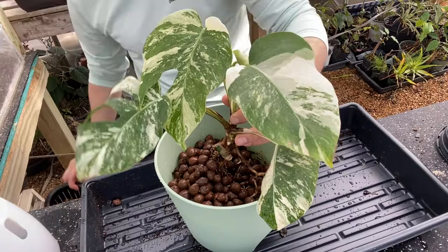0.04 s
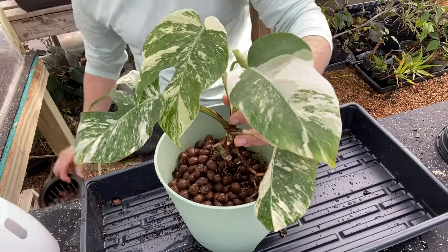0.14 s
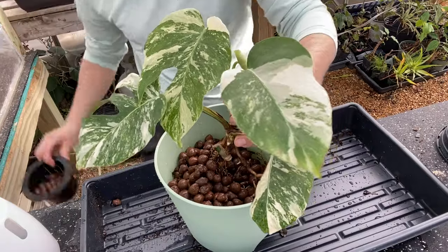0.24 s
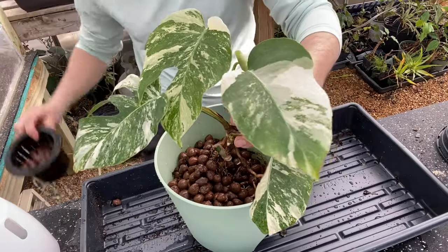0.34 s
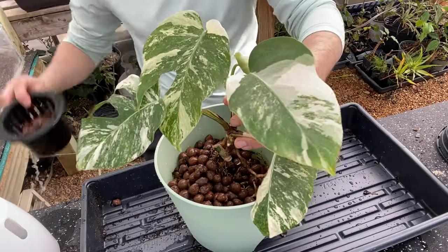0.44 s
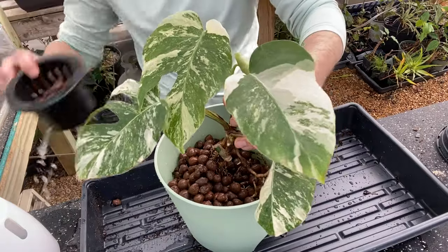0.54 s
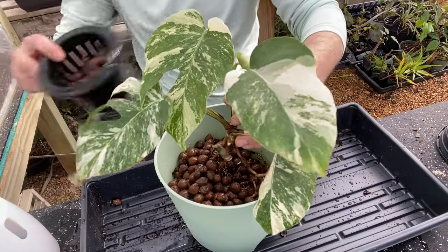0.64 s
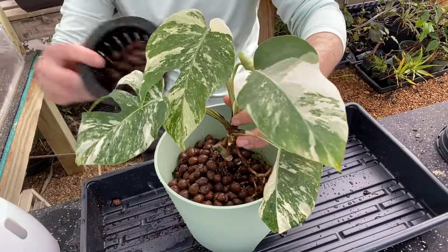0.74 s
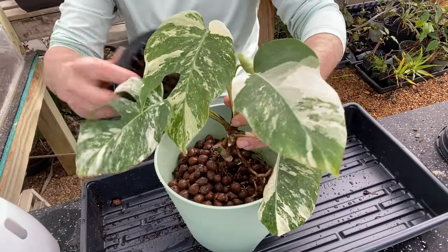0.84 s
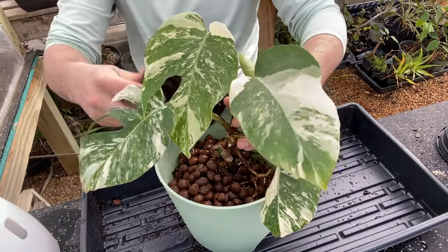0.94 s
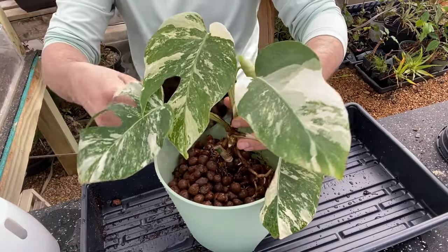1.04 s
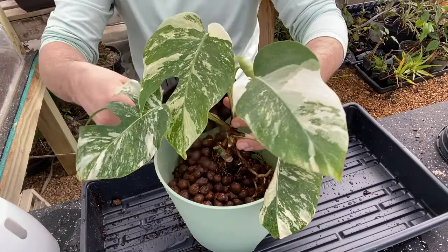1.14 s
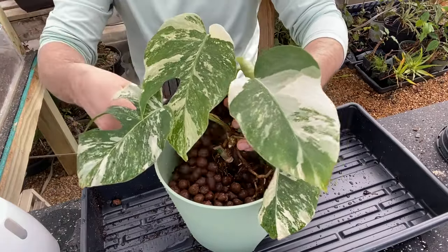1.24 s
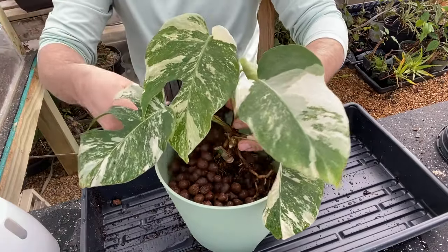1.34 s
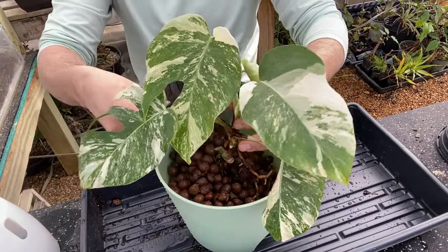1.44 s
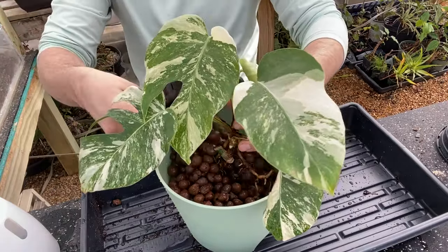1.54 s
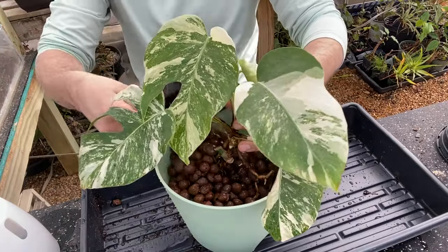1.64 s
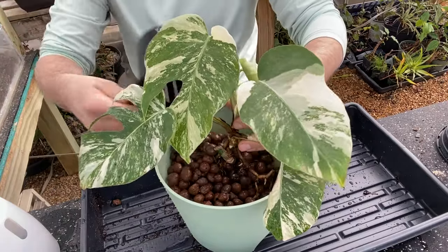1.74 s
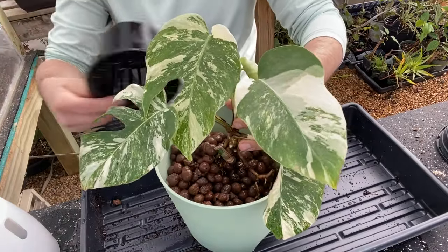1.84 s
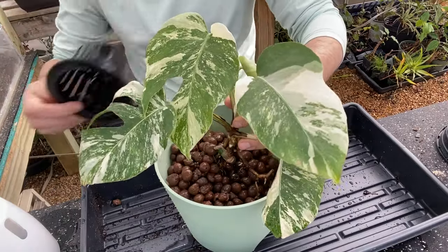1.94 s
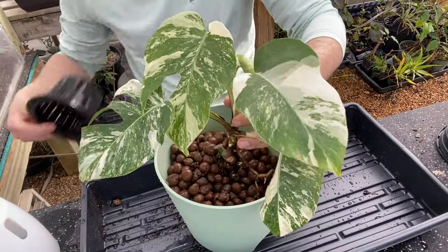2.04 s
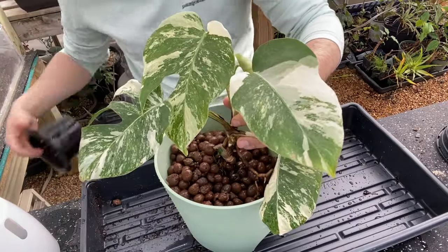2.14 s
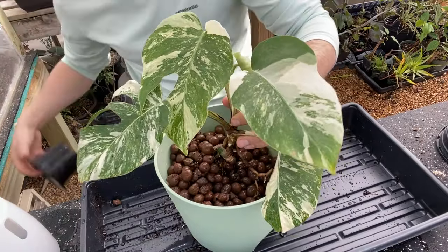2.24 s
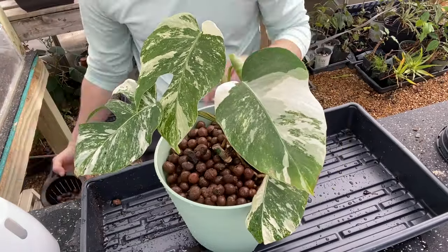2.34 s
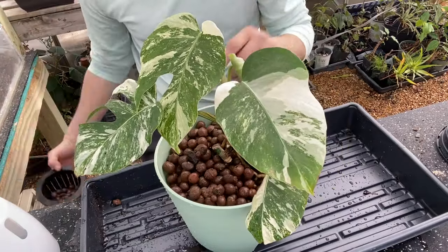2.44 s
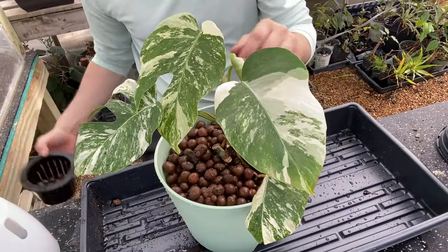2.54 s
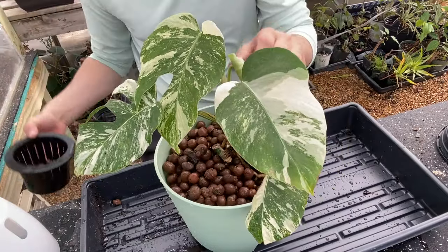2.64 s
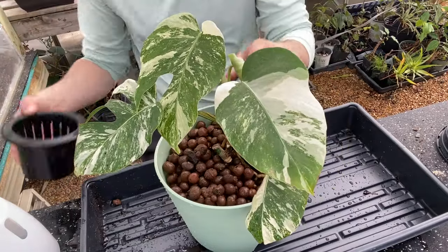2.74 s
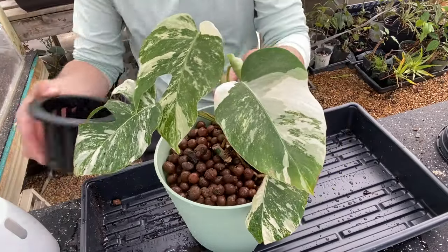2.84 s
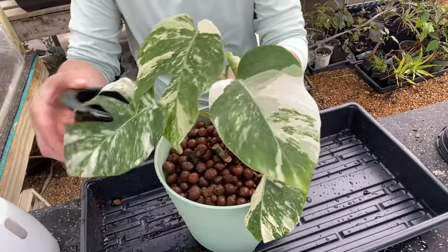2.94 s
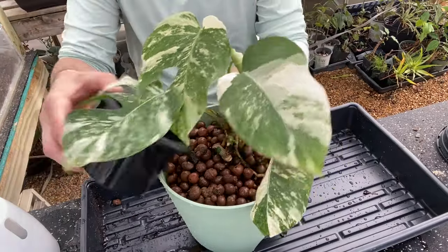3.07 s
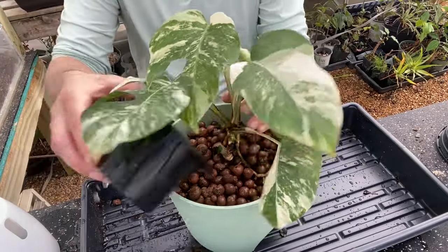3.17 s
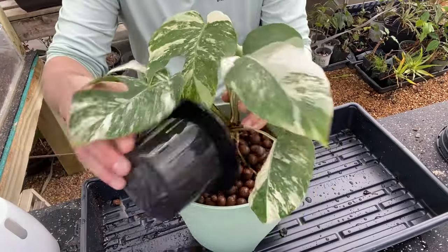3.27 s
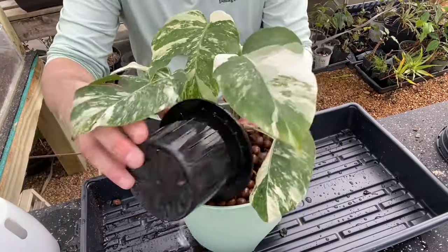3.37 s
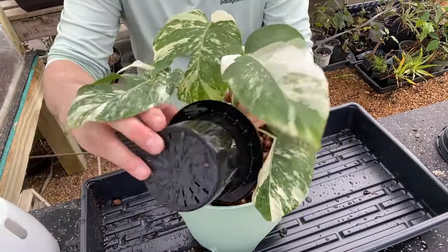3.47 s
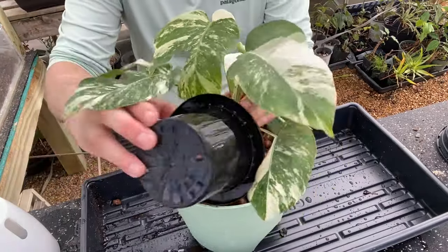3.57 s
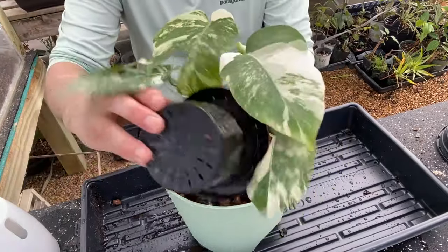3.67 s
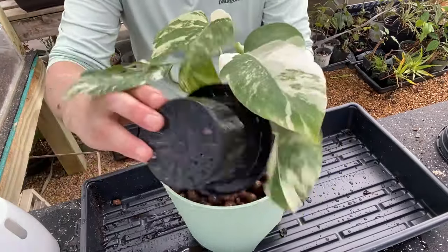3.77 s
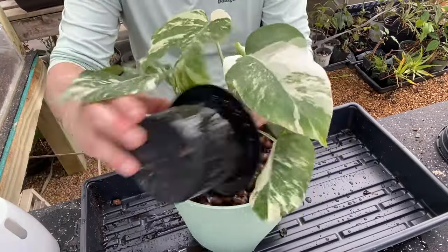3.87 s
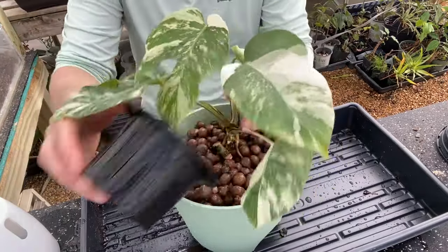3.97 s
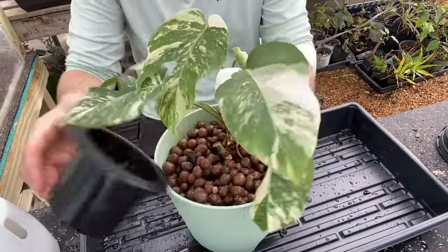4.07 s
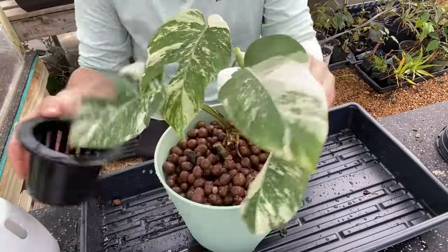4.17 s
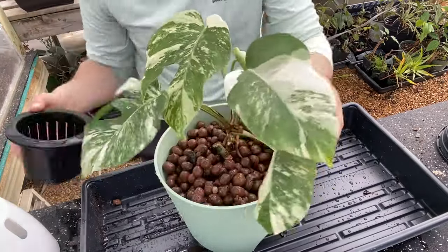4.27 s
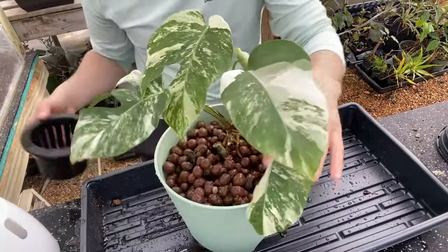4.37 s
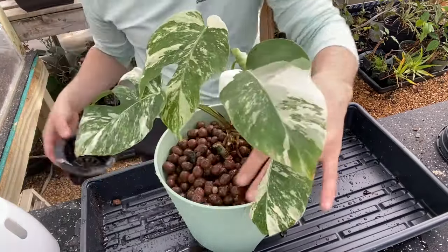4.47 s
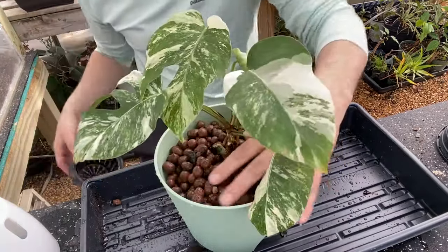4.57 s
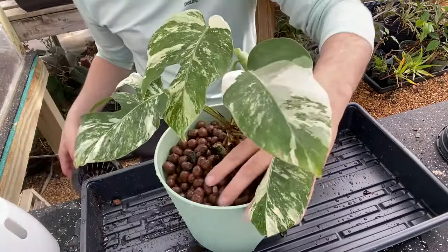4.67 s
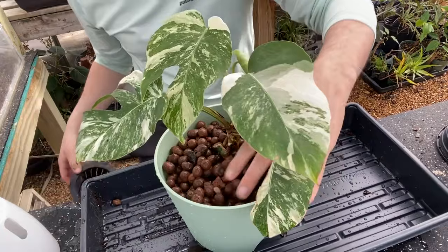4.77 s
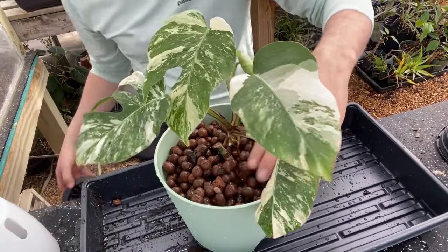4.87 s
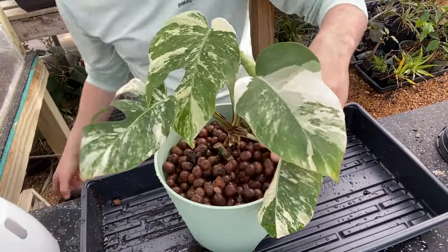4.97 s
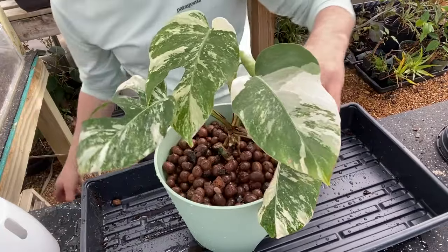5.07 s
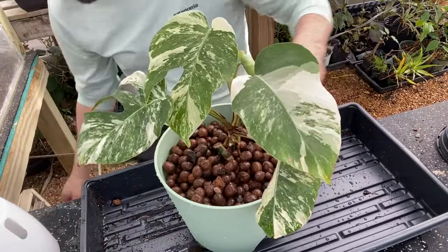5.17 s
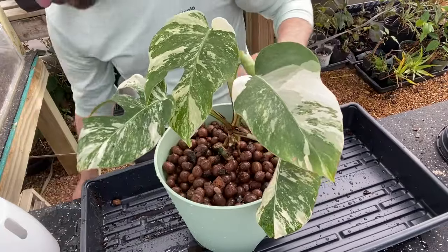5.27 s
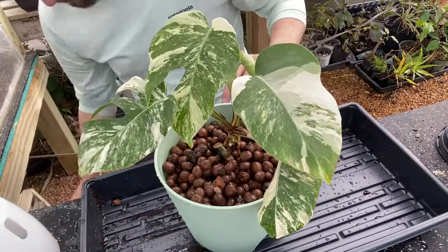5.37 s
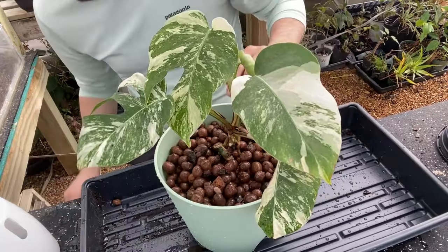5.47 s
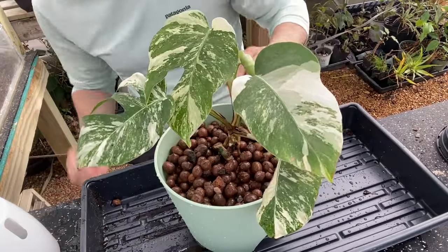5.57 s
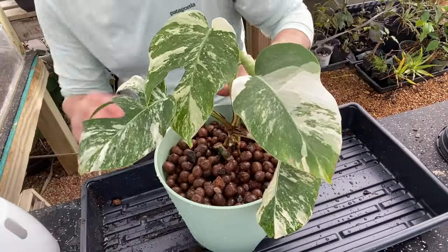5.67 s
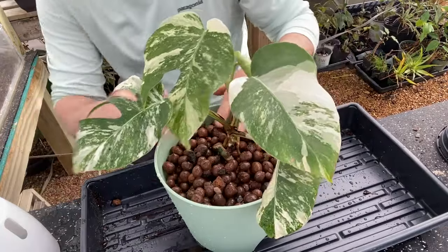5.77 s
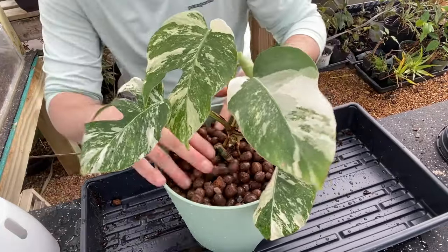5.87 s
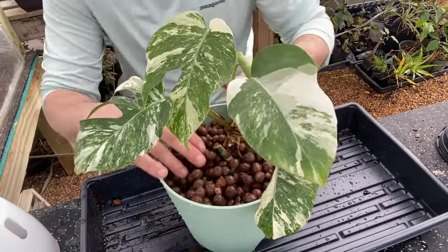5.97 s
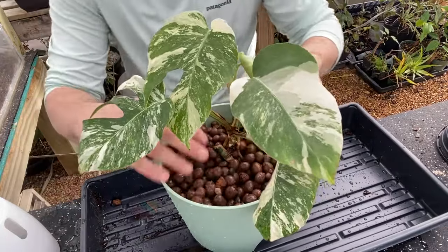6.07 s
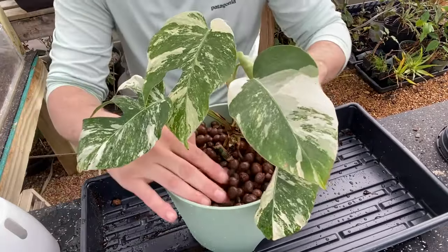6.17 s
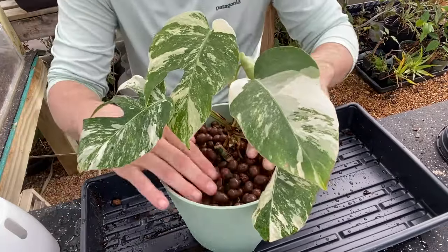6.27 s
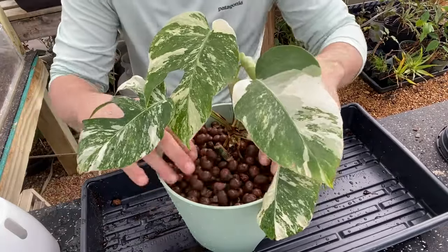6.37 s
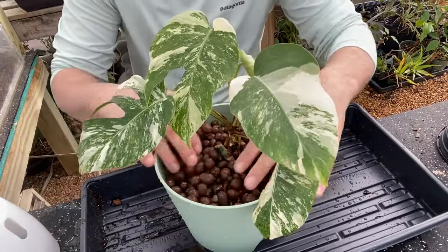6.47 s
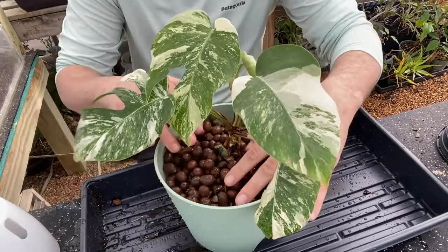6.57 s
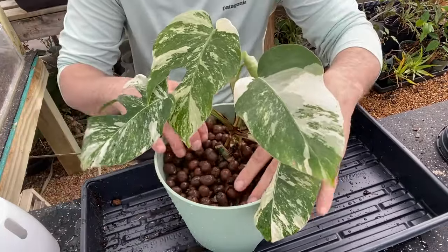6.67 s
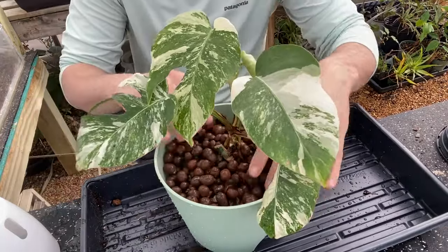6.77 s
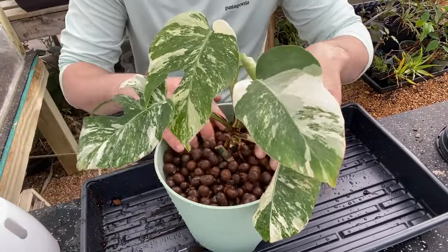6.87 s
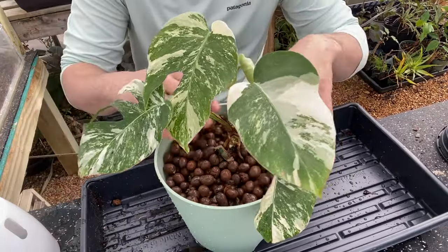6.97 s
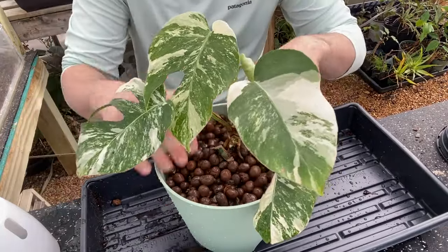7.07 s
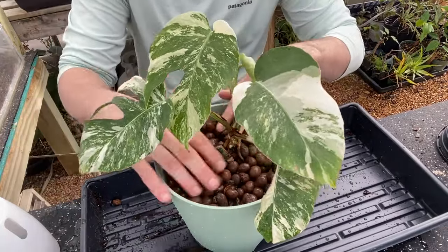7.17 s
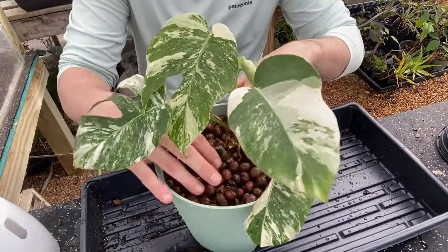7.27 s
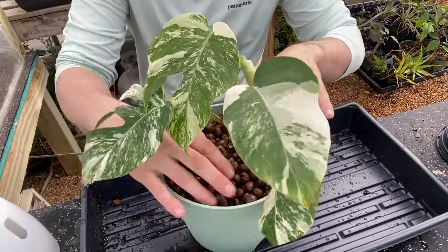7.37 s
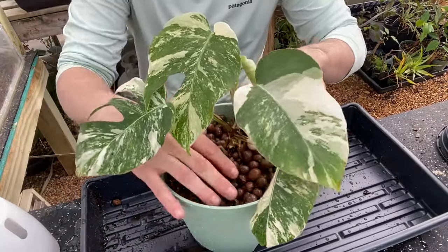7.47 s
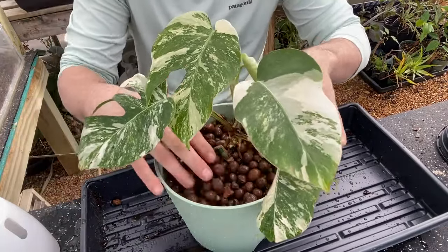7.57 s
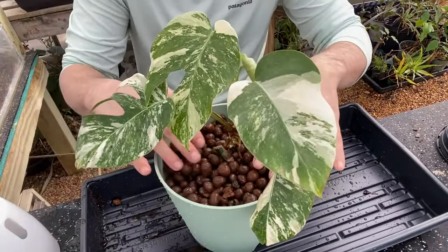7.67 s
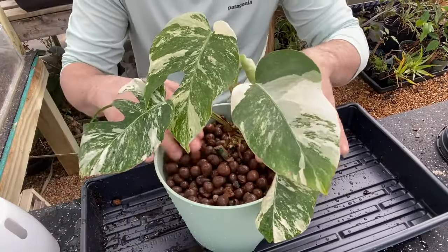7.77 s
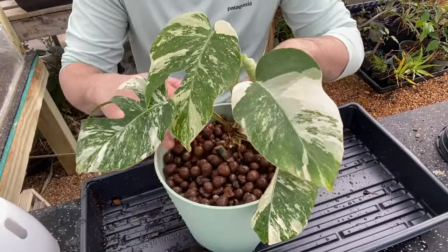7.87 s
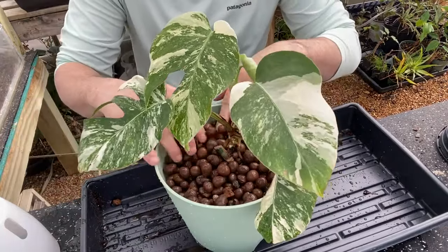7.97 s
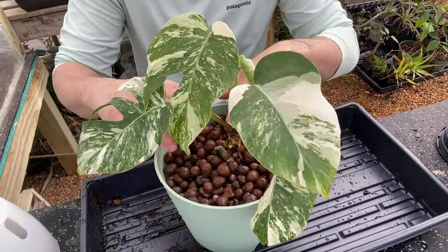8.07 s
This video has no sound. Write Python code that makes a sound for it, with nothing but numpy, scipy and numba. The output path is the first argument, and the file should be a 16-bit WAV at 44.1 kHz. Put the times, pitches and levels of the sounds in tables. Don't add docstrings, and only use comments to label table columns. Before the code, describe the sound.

Close up in a small greenhouse, a scoop of wet clay pebbles drains with plinking drips, then pours into a plastic pot in a dense, hard clatter. A few stragglers fall, there is a quieter pause, and a shorter second pour rushes in. The scoop lands with a thud, later scrapes and knocks sharply, and hands press the pebbles with repeated crunches and clicks over a faint low rumble.

```python
import sys
import numpy as np
from scipy import signal
from scipy.fft import rfft, irfft
from scipy.io import wavfile
from numba import njit

SR = 44100
rng = np.random.default_rng(int(sys.argv[2]) if len(sys.argv) > 2 else 0)


def ratio_of_db(decibels):
    return 10 ** (np.asarray(decibels, float) / 20)


def inscribe(sig):
    pcm = np.round(np.clip(np.atleast_2d(sig).T, -1, 1) * 32767)
    wavfile.write(sys.argv[1], SR, pcm.astype(np.int16))


N = 358079


def at(table, hz):
    f, v = np.transpose(table)
    return np.interp(np.log(np.maximum(hz, 1)), np.log(np.maximum(f, 1)), v)


def colour(x, gain_db):
    size = 4096
    cep = irfft(gain_db(np.fft.rfftfreq(size, 1 / SR)) * np.log(10) / 20)
    cep[1:size // 2] *= 2
    cep[size // 2 + 1:] = 0
    impulse = irfft(np.exp(rfft(cep)))
    return signal.oaconvolve(x, impulse[None], axes=1)[:, :N]


@njit
def ring(start, hz, t60, glide, left, right):
    out = np.zeros((2, N))
    for g in range(len(hz)):
        n = int(t60[g] * SR * .6)
        z, p = 1 + 0j, np.exp((2j * np.pi * hz[g] - np.log(1000) / t60[g]) / SR)
        turn = np.exp(2j * np.pi * hz[g] * glide[g] / t60[g] / SR ** 2)
        for i in range(start[g], min(start[g] + n, N)):
            out[0, i] += (left[g] * z).imag - left[g].imag * (i == start[g]) * .5
            out[1, i] += (right[g] * z).imag - right[g].imag * (i == start[g]) * .5
            z, p = z * p, p * turn
    return out


def place(s, hz, t60, size, glide, pan_db, scatter):
    # hz, left_lead_rad
    port_lead = [(0, 0), (1210, -0.9), (1980, -1.6), (5340, -3.1), (8180, 0.1), (10200, 3.1), (12200, 6.1),
                 (15300, 9.5)]
    lead = np.exp(.5j * (at(port_lead, hz) + scatter))
    side = ratio_of_db(pan_db / 2)
    start = (s * SR).astype(int)
    rows = np.broadcast_arrays(start, hz, t60, glide, size * side * lead, size / side / lead)
    return ring(*(np.ravel(r) for r in rows))


def noise(table, like):
    mid, side = rng.standard_normal((2, N))
    side = (1 - like) * side
    x = colour(np.array([mid + side, mid - side]), lambda hz: at(table, hz))
    return x / x.std()


def air():
    # hz, density_db_per_hz
    air_spectrum = [(88, -44), (150, -5), (380, -17.5), (741, -5), (1200, -1), (5270, -32.5), (8270, -23),
                    (12400, -34)]
    return noise(air_spectrum, like=0.1) * ratio_of_db(-56 - 10.5)


def greenhouse(x):
    t60_s, wet_db = 0.2, -10
    t = np.arange(int(.35 * SR)) / SR
    bright = rng.standard_normal((2, len(t))) * np.minimum(t / 0.0052, 1)
    dull = signal.lfilter([.3], [1, -.7], bright)
    tail = dull * ratio_of_db(-60 * t / t60_s) + 0.72 * bright * ratio_of_db(-60 * t / (0.56 * t60_s))
    tail *= ratio_of_db(wet_db) / np.sqrt(np.sum(tail ** 2, axis=1, keepdims=True))
    return x + signal.oaconvolve(x, tail, axes=1)[:, :N]


def surges(t, rows):
    s, db, rise, fall, tick_db = np.transpose(rows)[:, :, None]
    swell = np.maximum((s - t) / rise, 0) ** 2.9

    def shape(lingers):
        return db - 20 * (swell + np.maximum((t - s) / (fall * lingers), 0))

    return np.array([ratio_of_db(2 * v).sum(axis=0) for v in (shape(0.64), shape(0.6), shape(0.53) + tick_db)])


def pour(t, rows):
    s, db, tick_db = np.transpose(rows)
    outside_s = np.maximum(np.maximum(s[0] - t, t - s[-1]), 0)
    flow_db = np.interp(t, s, db) - 400 * outside_s
    return ratio_of_db(2 * np.array([flow_db, flow_db, flow_db + np.interp(t, s, tick_db)]))


def activity():
    # start_s, clack_db, tick_over_clack_db
    first_pour = [
        (0.838, -55.5, -9),
        (1.009, -44.5, -1.5),
        (1.105, -38, 4),
        (1.213, -34, 5),
        (1.529, -32, 3.5),
        (1.76, -37, 0),
        (1.891, -44, -11),
        (1.974, -47, 1.5),
        (2.037, -68, -20),
    ]
    second_pour = [
        (3.33, -59, -16),
        (3.402, -43, -2),
        (3.58, -30, 3.5),
        (3.744, -35.5, 2),
        (3.844, -34, -0.5),
        (3.924, -48, 0.5),
        (3.962, -41.5, -7.5),
        (4.042, -53.5, -4),
        (4.13, -49.5, -13),
    ]
    # peak_s, clack_db, rise_s, fall_s (both over 20 dB), tick_over_clack_db
    scoop_surges = [(0.01, -46, 0.11, 0.98, -1), (0.45, -51.5, 0.98, 0.69, -4),
                    (0.63, -58, 0.26, 0.45, 6.5), (0.82, -55, 0.99, 0.34, -61),
                    (2.078, -55, 0.15, 1.7, -10), (2.51, -66.5, 0.059, 0.072, 1.5),
                    (2.95, -59.5, 0.089, .15, -17), (2.71, -58, 0.032, 0.18, -18.5),
                    (4.45, -59, 0.11, 0.42, -18.5), (5.394, -36, 0.015, 0.21, -18.5),
                    (5.33, -60, .1, 0.38, -25), (5.53, -54, 0.062, 2.1, -17.5), (5.8, -78, 0.65, 0.43, -40)]
    tumble_surges = [
        (2.156, -45, 0.043, 0.13, -10),
        (2.347, -45, 0.0046, 0.18, -4),
        (2.992, -54, 0.047, 0.71, -1),
        (3.11, -45.5, 0.031, 0.37, -6.5),
        (3.276, -47.5, 0.04, 0.28, -6.5),
        (3.346, -35.5, 0.022, 0.1, -5.5),
        (4.141, -39.5, 0.018, 0.18, -9.5),
        (4.582, -60.5, 0.14, 0.13, -6.5),
        (5.12, -46, 0.013, 0.064, -5),
        (5.442, -35, 0.018, 0.11, -8.5),
    ]
    press_surges = [(4.685, -43, 0.036, 1, -6), (4.92, -38, 0.24, 0.14, -3.5),
                    (4.998, -37.5, 0.16, 0.14, -3), (5.886, -41, 0.015, 0.5, -11.5),
                    (6.051, -30.5, 0.15, 0.24, -4), (6.241, -35.5, 0.029, 0.36, -3),
                    (6.367, -37, 0.22, 0.22, -11), (6.497, -36.5, 0.016, 0.23, 3.5),
                    (6.58, -35.5, 0.096, 0.1, -0.5), (6.69, -35, 0.092, 0.73, -5),
                    (6.914, -31.5, 0.025, 0.43, -1), (7.264, -34, 0.035, 0.47, -5),
                    (7.466, -37.5, 0.015, 0.51, -5.5), (7.646, -35.5, 0.097, 0.22, -4.5),
                    (7.789, -39, 0.0081, 1, -2), (8.036, -31.5, 0.033, 0.18, -4)]
    thud_over_db = {"pour": -2.5, "scoop": -3, "tumble": -2.5, "press": -3.5}
    shake_over_db = {"pour": -18, "scoop": -14, "tumble": -14.5, "press": -15.5}
    bench_rest_db, bench_settles_s, step_s = -60.5, 0.047, .002
    t = np.arange(0, N / SR + step_s, step_s)
    parts = {"pour": pour(t, first_pour) + pour(t, second_pour), "scoop": surges(t, scoop_surges),
             "tumble": surges(t, tumble_surges), "press": surges(t, press_surges)}
    bands = sum(p * ratio_of_db(2 * np.array([[thud_over_db[k]], [0], [0]])) for k, p in parts.items())
    keep = np.exp(-step_s / bench_settles_s)
    drive = sum(p[1] * ratio_of_db(2 * shake_over_db[k]) for k, p in parts.items())
    shake = signal.lfilter([1 - keep], [1, -keep], drive)
    return t, 10 * np.log10(bands + 1e-12), 10 * np.log10(shake + ratio_of_db(2 * bench_rest_db))


def rumble():
    # hz, density_db_per_hz
    rumble_spectrum = [(20, -12), (35, -26.5), (54, 10.5), (156, -6), (258, -17.5), (400, -11), (520, -47),
                       (880, -120)]
    t, _, shake_db = activity()
    level_db = np.interp(np.arange(N) / SR, t, shake_db) + np.array([[-1.3], [1.3]])
    return noise(rumble_spectrum, like=0.57) * ratio_of_db(level_db)


def sway():
    # centre_s, level_db, length_s
    pushes = [
        (1.202, -52.5, 0.46),
        (3.158, -51.5, 0.16),
        (5.984, -47, 0.085),
        (6.28, -49.5, 0.09),
        (6.62, -46, 0.16),
        (7.013, -45, 0.17),
        (7.317, -39, 0.1),
        (7.534, -46, 0.14),
        (7.895, -45.5, 0.085),
        (8.066, -36, 0.064),
    ]
    sway_hz, width_hz = 51, 20
    t = np.arange(N) / SR
    push = sum(ratio_of_db(db) * np.exp(-((t - s) / length * 2) ** 2) for s, db, length in pushes)
    edges_hz = [sway_hz - width_hz / 2, sway_hz + width_hz / 2]
    band = signal.butter(2, edges_hz, "band", fs=SR, output="sos")
    rock = signal.sosfilt(band, rng.standard_normal(N))
    return push * rock / rock.std() * ratio_of_db(np.array([[-1.3], [1.3]]))


def thumps():
    # start_s, peak_db, pitch_hz, t60_s
    blows = [(1.3, -45.5, 229, .12), (1.4, -45, 300, .1), (2.343, -42, 567, .05), (5.3, -56.5, 331, .1),
             (3.341, -43.5, 324, 0.064), (4.137, -39.5, 80.5, 0.21), (4.135, -34.5, 122, 0.048),
             (4.19, -45, 99.3, 0.146), (5.386, -49, 630, 0.059), (5.441, -31.5, 422, 0.095),
             (5.467, -38, 307, 0.0405), (6.903, -43, 85.4, 0.14)]
    s, peak_db, hz, t60 = np.transpose(blows)
    t60 = np.clip(t60, .02, .4)
    bench = place(s, hz, t60, ratio_of_db(peak_db), -0.033, -1.0, 0.)
    tray = place(s, 1.86 * hz, t60 / 2, ratio_of_db(peak_db + 2.0), -0.12, 0., 0.)
    return bench + tray


def drips():
    # start_s, peak_db, pitch_hz, t60_s
    bubbles = [(0.058, -30, 2130, 0.041), (0.088, -35, 762, 0.057), (0.227, -35, 735.2, 0.095),
               (0.462, -36.5, 878, 0.09), (0.511, -33, 1520, 0.037), (0.088, -33, 1610, 0.038),
               (0.549, -30, 478, 0.092), (0.585, -39, 720, 0.064), (0.145, -37, 865, .05),
               (0.62, -34, 1203, 0.078), (0.704, -38.5, 846, 0.087)]
    # start_s, end_s, first_db, last_db
    run_off = [
        (0, 0.824, -48.5, -56.5),
        (2.529, 2.975, -64, -62),
        (5.446, 5.561, -57, -61.5),
    ]
    chance = rng.random((1800, 4)).T
    when = chance[0] * 5.9
    pitch = 620 * ratio_of_db(7.6 * chance[1] ** 3 + 2 * chance[3])
    flow = 0
    for start, end, first_db, last_db in run_off:
        flow = flow + (when > start) * (when < end) * ratio_of_db(np.interp(when, [start, end], [first_db, last_db]))
    size = flow * ratio_of_db(-1.73 * np.log(chance[2]))
    trickle = place(when, pitch, 32 / pitch, size, .08, 0., 2 * chance[3] - 1)
    s, peak_db, hz, t60 = np.transpose(bubbles)
    t60 = np.clip(t60, .02, .3)
    swell = place(s, hz, t60 / 4, -ratio_of_db(peak_db), 0.37 / 4, 0., 0.)
    return place(s, hz, t60, ratio_of_db(peak_db), 0.413, 0., 0.) + swell + trickle


def rub():
    # (hz, level_db)
    drags = [
        (4.55, 4.614, 0.25, [(1040, -57.5), (1850, -58), (2480, -47.5), (3900, -59)]),
        (5.385, 5.433, 0.41, [(540, -35.5), (760, -52), (1900, -52)]),
        (5.585, 5.79, 0.56, [(500, -51.5), (1330, -67), (1800, -76)]),
        (5.7, 5.75, .04, [(1370, -58)]),
        (4.783, 4.835, 0.034, [(500, -46.5)]),
        (4.875, 4.95, .04, [(500, -47)]),
        (5.96, 6.07, .04, [(500, -52)]),
        (2.72, 2.815, 0.06, [(610, -84), (1170, -69), (1830, -60.5), (2350, -75.5)]),
        (2.495, 2.54, 0.027, [(1340, -56.5)]),
        (0.045, 0.61, 0.43, [(690, -54.5), (1700, -66)]),
    ]
    slips_per_s, t60_s = 900, .025
    out = 0
    for start, end, spread, modes in drags:
        hz, db = np.transpose(modes)
        chance = rng.random((480, len(hz) + 1))
        grip_db = 1.6 * np.repeat(rng.standard_normal(30), 16)
        s = start + (np.arange(480)[:, None] + chance[:, :1]) / slips_per_s
        size = ratio_of_db(db + grip_db[:, None]) * (s < end)
        out = out + place(s, hz * (1 + spread * chance[:, 1:]), t60_s, size, 0., -1.5, 0.)
    return out


def wall():
    wall_hz, t60_s, ring_db = 514, .16, -16.5
    chance = rng.random((900, 3)).T
    s = chance[0] * N / SR
    t, levels_db, _ = activity()
    fill_db = np.interp(s, [2, 3.4], [-8, 0])
    db = np.interp(s, t, levels_db[0]) + ring_db + fill_db + 8 * chance[1]
    return place(s, wall_hz * (1 + 0.006 * (chance[2] - .5)), t60_s, ratio_of_db(db), 0., -1.1, 0.)


def body_db(hz):
    # hz, density_db_per_hz
    broad = [(160, -12.5), (358, -24.5), (510, -10), (1010, -8), (2610, -1.5), (5400, -12), (7950, -13),
             (9500, -15)]
    # pitch_hz, width_hz, level_db
    wall_modes = [(502, 8.3, -4), (786, 300, -3.5), (1170, 125, 5), (2130, 580, -1.5), (2760, 290, -14.5),
                  (4120, 1100, -21.5)]
    peaks = sum(ratio_of_db(db) / (1 + ((hz - f) / w * 2) ** 2) for f, w, db in wall_modes)
    return at(broad, np.minimum(hz, 9500.)) + 20 * np.log10(1 + .6 * peaks)


def band_db():
    # low_hz, high_hz
    bands_hz = [(400, 900), (1000, 3500), (6000, 9500)]
    return np.array([10 * np.log10(np.sum(ratio_of_db(2 * body_db(np.arange(lo, hi))))) for lo, hi in bands_hz])


def collide(s, db, chance, t60_2k, lag_s, count):
    u, g, spot = chance[:, :count], chance[:, count:2 * count], chance[:, -1:]
    hz = 250 * (15500 / 250) ** (((np.arange(count) + u) / count) ** .75)
    share = np.interp(np.log(hz), np.log([600, 1900, 7500]), [0, 1, 2])
    weight = np.maximum(1 - np.abs(share[..., None] - np.arange(3)), 0)
    mode_db = (weight * db[:, None]).sum(axis=-1)
    spacing = hz * np.log(hz / 200) ** -.33
    t60 = t60_2k * (hz / 2000) ** -.4 * (.5 + g)
    favour = ratio_of_db(11 * ((g * 7 % 1) - 0.5779))
    size = ratio_of_db(mode_db) * np.sqrt(spacing / t60) * np.sign(np.sin(hz)) * favour
    onset = s[:, None] + lag_s * (2000 / hz) ** .2 * (g * 13 % 1) ** 2.2
    spread = at([(300, 0.64), (2000, 1.05), (4500, 1.48), (8000, 0.34)], hz)
    scatter = (3.34 * (spot - .5) + 0.4 * (u * 11 % 1 - .5)) * spread
    pan_db = at([(500, -2.0), (2000, 0.0), (4000, -3.0), (8000, -1.0)], hz) + 4 * (u * 17 % 1 - .5)
    return place(onset, hz, t60, size, 0., pan_db, scatter)


def bed():
    spread_db, biggest, trim_db, avalanche_db = 3.5, 2.6, -28.0, 2.0
    chance = rng.random((14000, 19))
    s = (np.arange(14000) + 8 * rng.random(14000)) * N / SR / 14008
    t, levels_db, _ = activity()
    db = np.transpose([np.interp(s, t, c) for c in levels_db])
    db += avalanche_db * np.interp(s, np.arange(500) / 60, rng.standard_normal(500))[:, None]
    db += trim_db - band_db() + spread_db * np.minimum(-np.log(chance[:, -2:-1]), biggest)
    return collide(s, db, chance, t60_2k=0.022, lag_s=.0007, count=8)


def knocks():
    # start_s, clack_db, strongest_mode_hz, tick_over_clack_db
    light_taps = [(0.442, -45, 2560, 3), (0.598, -59.5, 2500, 18), (0.95, -37, 2230, -13),
                  (0.968, -36, 1960, -7), (0.978, -41, 2000, 0), (1.096, -23, 2580, -8),
                  (1.149, -27, 1900, -1), (1.205, -25, 2170, 1.5), (1.253, -38.5, 1910, 20.5),
                  (1.654, -18.5, 1420, -9.5), (1.97, -25.5, 1240, -26), (2.055, -43.5, 636, -12),
                  (2.08, -43.5, 1170, -19), (2.294, -37, 1990, -12), (2.342, -27, 1880, -13.5),
                  (3.084, -35.5, 474, -17), (3.864, -45.5, 534, 15.5), (3.965, -31, 724, -14),
                  (4.922, -30.5, 3430, -18), (4.978, -25, 2500, -25), (5.076, -46, 2500, -7),
                  (5.136, -45, 826, 0.5), (6.484, -36.5, 1980, -6), (7.2525, -30, 1070, -5),
                  (6.64, -15, 1970, -11), (7.454, -23, 1170, -13.5), (7.937, -35.5, 1150, -13)]
    hard_falls = [(1.214, -21, 1990, -4), (1.265, -20, 1115, -8), (1.353, -17, 1170, -18),
                  (1.374, -19, 2200, -7), (1.425, -17.5, 2640, -14), (1.514, -25, 2620, -5),
                  (1.53, -20.5, 1170, -12), (1.668, -23, 1170, -8), (1.703, -24, 1215, -21),
                  (1.789, -18, 1170, -12), (1.852, -34, 1190, -6), (2.117, -33.5, 1170, -10.5),
                  (2.145, -23.5, 1235, -26), (2.239, -42, 2500, -13.5), (3.34, -32.5, 1170, -9),
                  (3.475, -27, 3200, -0.5), (3.623, -20, 1510, -42), (3.736, -16.5, 2720, -12),
                  (3.771, -17, 2530, -12), (3.937, -29, 2730, -7)]
    clear_knocks = [
        (4.132, -31, 2030, -6.5),
        (4.222, -35, 1010, -23),
        (4.687, -36, 1060, -24),
        (5.002, -29.5, 1250, -9),
        (6.227, -24.5, 1120, -8.5),
        (6.573, -27.5, 2000, -9),
        (7.072, -31.5, 1170, -7),
        (7.105, -35, 2320, -4),
    ]
    long_crunches = [
        (1.446, -19, 2500, -18),
        (1.903, -38.5, 1730, -2),
        (3.498, -32, 1980, 4.5),
        (5.433, -20, 2185, -12.5),
        (6.898, -25.5, 1950, -17),
        (7.634, -27, 3200, -1),
        (8.022, -24.5, 1960, -6),
    ]
    poured = [(0.091, -39, 1970, -13), (0.524, -50, 1440, -26), (0.624, -47, 1220, -19),
              (1.037, -30, 2130, -20), (1.047, -35.5, 2170, -5), (1.06, -28, 1800, -11),
              (1.107, -24.5, 1880, -5.5), (1.122, -37, 2150, -5), (1.139, -37, 2100, 3),
              (1.172, -40, 1990, -15), (1.298, -40, 1850, 3), (1.332, -30, 2030, 2),
              (1.382, -26, 1910, -10), (1.418, -26.5, 2800, -8), (1.466, -30.5, 1820, 3.5),
              (1.488, -31, 2680, -4.5), (1.52, -25.5, 1830, -2), (1.536, -26, 1190, -10),
              (1.552, -30, 2510, -7), (1.599, -42, 2840, -5.5), (1.612, -25.5, 1170, -14),
              (1.624, -39, 1140, 3.5), (1.741, -29, 1240, -13), (1.753, -35, 1150, -17),
              (1.799, -47, 1160, 4), (1.943, -40, 2900, -5.5), (2.154, -42, 2760, -16),
              (2.164, -45, 1130, -11), (2.352, -49, 2640, -15), (2.99, -51, 1130, 1.5),
              (3.14, -44.5, 1940, -10), (3.279, -49, 1150, 8), (3.39, -44, 1870, -13),
              (3.433, -35, 3420, -3.5), (3.521, -32, 1310, -10), (3.546, -35, 1390, 0),
              (3.572, -28.5, 880, -6), (3.588, -29, 1320, -3), (3.605, -27, 2580, -13),
              (3.657, -30, 1990, -5), (3.664, -28, 1280, -5), (3.746, -32, 1160, -0.5),
              (3.84, -27.5, 2440, -12), (4.009, -41.5, 1880, -15), (4.059, -46, 1260, -5),
              (4.14, -40, 2080, -16)]
    pressed = [(4.79, -47, 2760, -12), (4.831, -43.5, 2290, 7.5), (5.034, -36.5, 2530, -15),
               (5.111, -43, 3270, -11), (5.444, -26.5, 2150, -23), (6.018, -29, 2880, -10),
               (6.071, -30, 1120, -8), (6.154, -37.5, 1240, -5), (6.197, -47.5, 1960, -4),
               (6.309, -30, 1090, -17), (6.375, -34, 1090, -5.5), (6.497, -36.5, 2100, 4),
               (6.646, -24, 1200, -18), (6.657, -42, 2850, -7), (6.689, -43, 1190, -8),
               (6.778, -40, 2500, -15), (6.787, -39, 1150, -20), (6.931, -32.5, 2540, -1),
               (6.968, -33, 2000, -14), (7.011, -51, 1280, -14), (7.263, -46, 1220, -4),
               (7.269, -46, 1980, 3.5), (7.362, -34, 2000, -18), (7.473, -32, 1190, -19),
               (7.579, -37, 2970, -19), (7.619, -29.5, 3080, -15), (7.651, -34, 2700, -7),
               (7.793, -38, 1050, -6), (7.8, -39, 2480, -28), (7.86, -35, 2030, -8), (7.882, -35, 2040, 0),
               (7.981, -39.5, 1120, -6), (8.034, -27, 2200, -9), (8.041, -27, 2910, -16)]
    # start_s, peak_db
    dry_ticks = [(0.218, -24.5), (0.3905, -48), (1.2253, -9), (3.265, -28), (3.3762, -24.5), (3.4181, -25),
                 (4.821, -36), (6.2478, -16), (7.19, -36), (7.676, -23), (7.6917, -20), (7.72, -25.5),
                 (0.065, -28), (0.143, -34), (0.174, -30.5), (0.293, -32), (0.922, -38), (1.192, -18),
                    (1.282, -13), (1.317, -12), (1.39, -25), (1.433, -15), (1.547, -16), (1.576, -15),
                    (1.594, -17), (1.697, -16.5), (1.735, -18), (1.746, -20), (1.82, -21), (3.331, -31),
                    (3.468, -22), (3.528, -18), (3.56, -17), (3.595, -17), (3.678, -23), (3.687, -22),
                    (3.805, -20), (3.899, -24.5), (4.072, -32), (4.121, -35), (4.148, -27.5), (4.673, -30),
                    (4.866, -23), (5.998, -30), (6.051, -21), (6.062, -23), (6.086, -31), (6.13, -21),
                    (6.177, -29), (6.361, -26), (6.369, -30), (6.409, -34), (6.419, -26), (6.457, -32),
                    (6.555, -28), (6.671, -20), (6.912, -15), (7.089, -23), (7.099, -25), (7.154, -30),
                    (7.243, -27), (7.602, -23), (7.736, -33), (7.78, -27), (7.834, -28), (7.927, -24),
                    (7.976, -33)]
    contact_s = (.0008, .003, 0.004, 0.018, .001, .003, .003)
    wall_thud_db = (-17.5, -13.5, -5, -27, -25, -15, -12)
    trim_db, mode_db, stand_out_db = -19, 2.5, 1.7
    ticks = [(s, db - 22.5, 2500, 8.5) for s, db in dry_ticks]
    outstanding = [np.add(k, [0, stand_out_db, 0, 0]) for k in (poured, pressed)]
    kinds = (light_taps, hard_falls, clear_knocks, long_crunches, ticks, *outstanding)
    s, clack_db, hz, tick_db = np.concatenate(kinds).T
    length, wall_db = (np.repeat(v, [len(k) for k in kinds]) for v in (contact_s, wall_thud_db))
    thud_db = wall_db - 0.32 * (clack_db + 31.0)
    chance = rng.random((len(s), 82))
    db = clack_db[:, None] + np.transpose([thud_db, 0 * s, tick_db]) - band_db() + trim_db
    own_size = ratio_of_db(clack_db + mode_db - body_db(hz))
    own = place(s + length / 5, hz, 0.018 * (hz / 2000) ** -.25, own_size, 0., 0., chance[:, -2] - .5)
    return collide(s, db, chance, t60_2k=0.03, lag_s=length[:, None], count=40) + own


def scene():
    pebbles = colour(bed() + knocks(), body_db)
    thin = colour(drips() + rub(), lambda hz: at([(220, -14), (430, 0)], hz))
    return greenhouse(pebbles + thin + thumps() + wall()) + rumble() + sway() + air()


def roll_off(x):
    return signal.sosfilt(signal.butter(12, 15730, fs=SR, output="sos"), x)


def record(dry):
    # hz, gain_db
    port_gain = [(9400, -1), (9900, -5), (10200, -13.5), (11000, -17.5), (11300, -16), (13000, -20),
                 (14300, -34.5), (16000, -39)]
    mix = colour(dry, lambda hz: at(port_gain, hz))
    return roll_off(mix)


dry = scene()
out = record(dry)
inscribe(out)
```